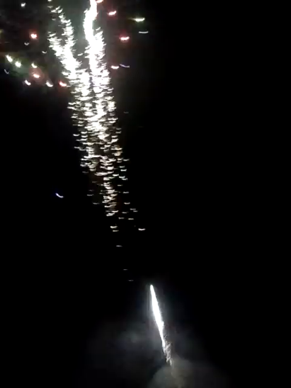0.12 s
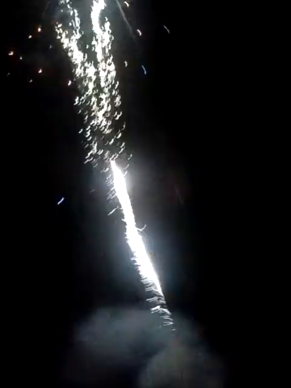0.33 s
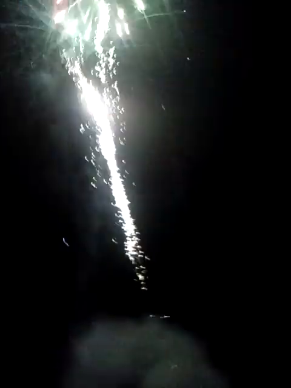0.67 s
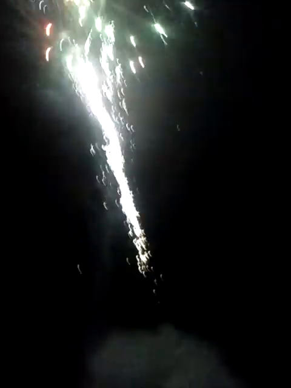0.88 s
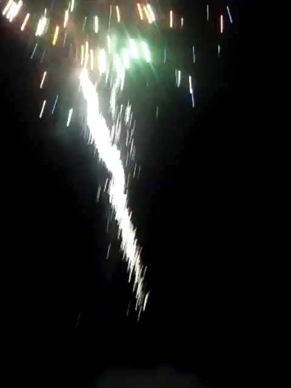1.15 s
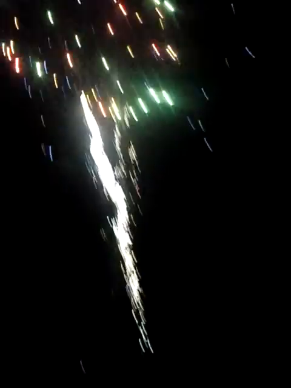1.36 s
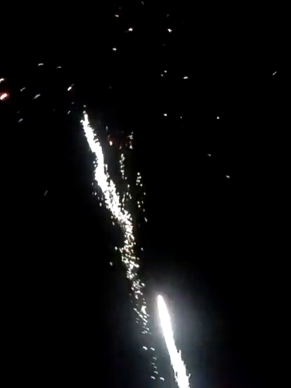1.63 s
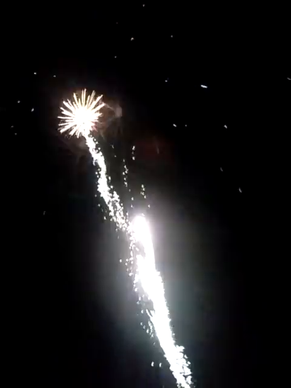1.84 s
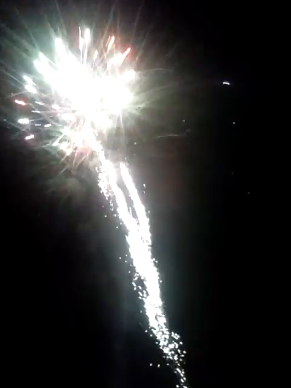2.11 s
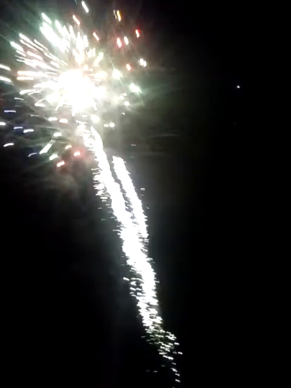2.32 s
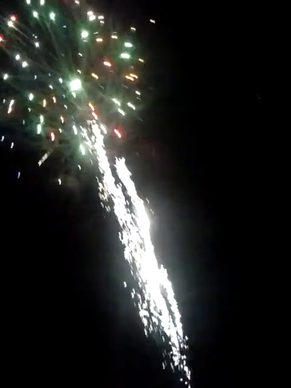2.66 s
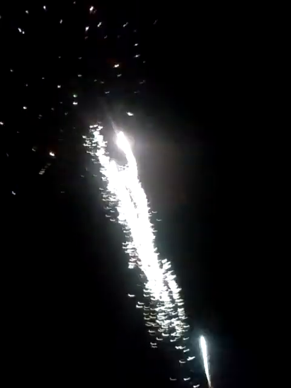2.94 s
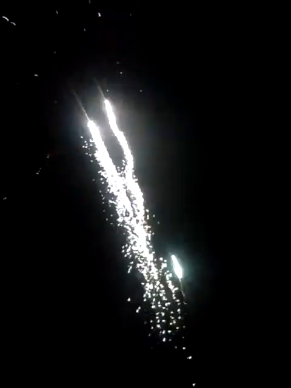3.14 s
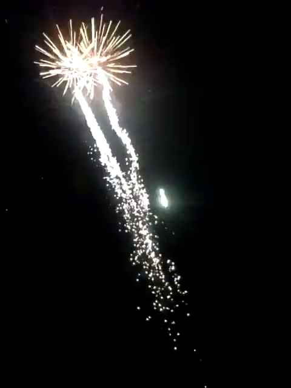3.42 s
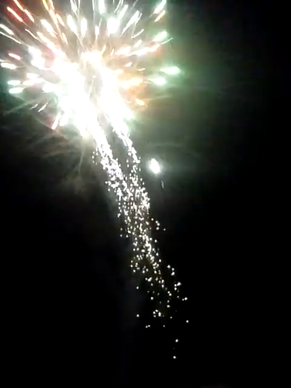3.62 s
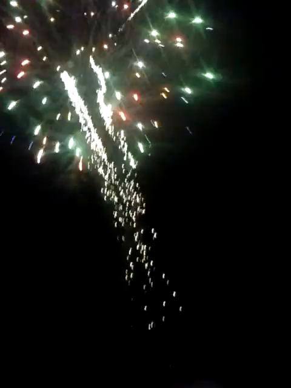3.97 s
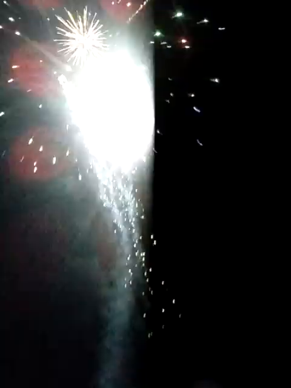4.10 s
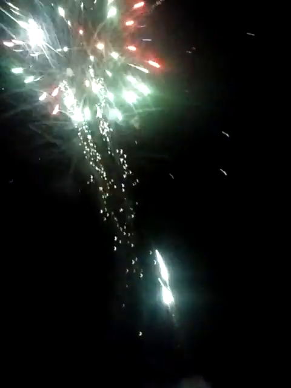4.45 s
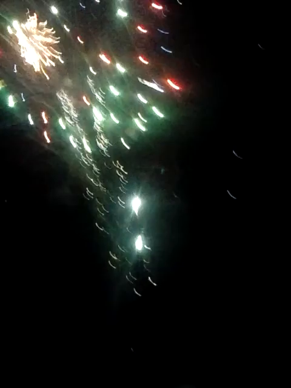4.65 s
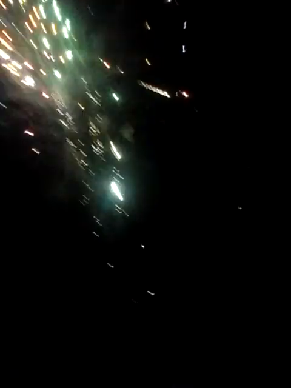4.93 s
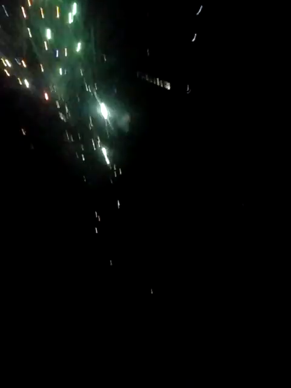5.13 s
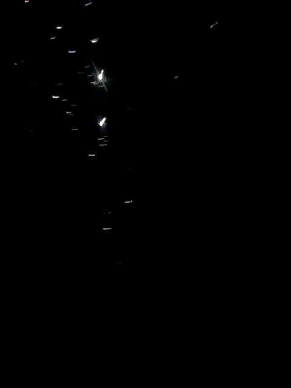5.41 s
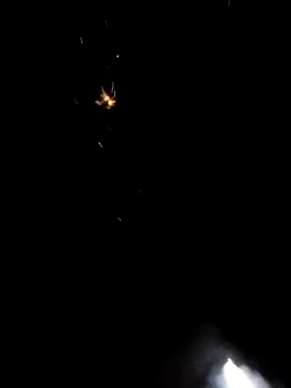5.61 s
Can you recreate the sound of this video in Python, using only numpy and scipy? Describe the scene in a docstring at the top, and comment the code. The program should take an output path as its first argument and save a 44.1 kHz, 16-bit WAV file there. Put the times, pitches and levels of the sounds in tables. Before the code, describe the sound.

A firework battery fires close by outdoors at night, heard through a narrow-band phone microphone that overloads on bangs and lacks deep bass. It opens on the fading echo and hiss of an earlier burst. Hollow tube thumps with short gas spurts come at 0.2 and 0.4 s, then hard, dry cracks overhead at 0.7 and 1.1. Launches follow at 1.55 and 1.7, a crack at 2.1, and a tight launch-and-burst cluster at 2.45-2.6. A tiny fizz and weak puff occur near 2.8. Double cracks hit at 3.65-3.7 and 4.4, with a barely audible rising thin tone around 3.9-4.15 and soft launches at 4.2-4.3. A weaker crack lands at 4.9; a light launch thump at 5.7 ends it. Each burst brings instant wall slaps, a brief boom, dull house thuds within half a second, a bright tree wash and sizzling stars, fading into faint air hiss.

```python
"""A firework cake at night, close to a narrow-band phone microphone, under a faint steady hiss of night air.
It opens in the echoes of a shell already burst; mortar tubes then thump with jets of gas and comets hiss.
Shells crack overhead as short pressure waves, with booms, wall slaps, house echoes, a tree wash and hissing stars.
Launches and bursts alternate to the end; a short fizz and later a faint rising tone sound among them.
The microphone sheds deep bass, overloads on the bangs, turns itself down and rings at its band edge."""
import sys
import numpy as np
from scipy import signal
from scipy.fft import rfft, irfft
from scipy.io import wavfile

SR = 44100
rng = np.random.default_rng(int(sys.argv[2]) if len(sys.argv) > 2 else 0)


def generate_wav(sig):
    """Save sig (samples, or channels by samples) to the path in sys.argv[1] as 16-bit PCM at SR."""
    pcm = np.round(np.clip(np.atleast_2d(sig).T, -1, 1) * 32767).astype(np.int16)
    wavfile.write(sys.argv[1], SR, pcm)


N = 254893
TIME = np.arange(N) / SR  # s from the start of the scene
AGE = np.arange(SR // 2) / SR  # s from the start of one event

# mortar launches; levels are relative:
# start_s, blast_db, jet_db, scatter_db, tube_travel_ms (the shell's time up the tube), jet_centre_hz
LAUNCHES = [(0.1883, 1.5, 1, 2, 5.8, 3760), (0.3652, -1.5, 5.5, 2.5, 3.6, 2960),
            (1.5573, 2.5, 2, 2.5, 6.6, 3130), (1.7129, 1, 2.5, 2, 3.95, 2460),
            (2.4600, 2.5, 3, 2, 3.4, 2620), (2.579, -1.5, -6, -1, 1.7, 4300),
            (2.8379, -17.5, -5, -13, 10, 4200), (4.1886, -15.5, -3.5, -11, 10, 3200),
            (4.277, -9.5, -2.5, -7.5, 6.2, 3400), (5.7119, -11, -3, -7.5, 6.1, 4540)]
# shell bursts overhead; levels are relative: start_s, blast_db, overpressure_ms, scatter_db, far_echo_db
BURSTS = [(-0.225, 0, 1, -2, 2), (0.7125, -2, 0.97, -0.5, 1), (1.0937, -2, 1.33, -2, 1),
          (2.1141, -2, 0.7, -1, 1), (2.5082, -5, 1.3, -3.5, -2), (3.6429, -1, 0.88, 0.5, 3),
          (3.6990, -2.5, 1, -1, 0), (4.3754, -1, 0.73, -1, 1), (4.4298, 2.5, 0.82, 3.5, 2),
          (4.9078, -8, 0.98, -7.5, -2)]


def undb(db):
    """Decibels to gain."""
    return 10 ** (np.asarray(db) / 20)


def add(out, start_s, sound):
    """Mix a sound into out from start_s on; it may have begun before time 0."""
    i = int(round(start_s * SR))
    part = sound[max(-i, 0):max(len(out) - i, 0)]
    first = max(i, 0)
    out[first:first + len(part)] += part


def butter(x, hz, kind, order=2):
    """Causal Butterworth low-pass or high-pass."""
    return signal.sosfilt(signal.butter(order, min(hz, .45 * SR), kind, fs=SR, output="sos"), x)


def on_log_axis(hz, points, values):
    """Read a table along log frequency."""
    return np.interp(np.log(hz + 1), np.log(points), values)


def colour(x, spectrum):
    """Shape x by a spectrum of (hz, db) points, then bring it to rms 1."""
    hz = np.fft.rfftfreq(len(x), 1 / SR)
    gain = undb(on_log_axis(hz, *np.transpose(spectrum)))
    y = irfft(rfft(x) * gain, len(x))
    return y / np.std(y)


def coloured_burst(spectrum):
    """Fresh random noise as long as one event, coloured, at rms 1."""
    return colour(rng.standard_normal(len(AGE)), spectrum)


def swell(centre_s, width_s):
    """A short bell-shaped rise and fall."""
    return np.exp(-.5 * ((AGE - centre_s) / width_s) ** 2)


def waver(hz):
    """A random wobble of unit spread, low-passed at hz."""
    x = butter(rng.standard_normal(N), hz, "low")
    return x / np.std(x)


def noise(spectrum, flutter_db, flutter_hz):
    """Coloured noise whose level flutters at random."""
    return colour(rng.standard_normal(N), spectrum) * undb(flutter_db * waver(flutter_hz))


def linger(events, fall_db_per_s, peak_s=0, rise_db_per_s=0):
    """Joint envelope of (s, dB) events that each swell or hold until peak_s, then fade; their powers add."""
    power = 0
    for start_s, db in events:
        past = TIME - start_s - peak_s
        level_db = db + np.minimum(rise_db_per_s * past, -fall_db_per_s * past)
        power = power + (TIME > start_s) * undb(level_db) ** 2
    return np.sqrt(power)


def blast(length_ms):
    """A shock front, a short overpressure and a longer suction."""
    u = AGE * 1000 / length_ms
    return (1 - u) * np.exp(-u)


def reflect(wave, paths):
    """The direct wave and its near reflections, each delayed and scaled by its path."""
    out = np.zeros(len(wave))
    for delay_ms, db in paths:
        add(out, delay_ms / 1000, undb(db) * wave)
    return out


def scatter(table, start_s, rise_s):
    """Countless small reflections as decaying noise; each octave dies at its own pace."""
    points, db, t60 = np.transpose(table)
    spectrum = rfft(coloured_burst(np.c_[points, db]))
    octave = np.clip(np.log2(np.fft.rfftfreq(len(AGE), 1 / SR) / 60 + 1e-9), 0, 7)
    out = 0
    for k in range(8):
        # overlapping triangular bands, one octave apart from 60 Hz up
        band = irfft(spectrum * np.maximum(1 - abs(octave - k), 0), len(AGE))
        t60_s = on_log_axis(60 * 2 ** k, points, t60)
        out = out + band * np.exp(-np.log(1000) * AGE / t60_s)
    return out * np.clip((AGE - start_s) / rise_s, 0, 1)


def night():
    """A faint, dull, steady hiss of open air, made of coloured noise."""
    # spectrum of the night air: frequency_hz, relative_level_db (per Hz)
    night_air = [(25, 0), (60, -3), (150, -3), (500, -2.5), (1000, 0), (2300, 1), (3800, -7), (5000, -16),
                 (7000, -26)]
    return undb(-56.5) * colour(rng.standard_normal(N), night_air)


def bursts(echo_blur_db=-17, slap_db=-17, slap_fall_db_per_ms=0.5):
    """Shells crack overhead; the wall answers about as loudly, far houses with dull thuds."""
    # near reflections off ground and wall: delay_ms, level_db
    near_paths = [(0, 0), (2.7, -12), (4.7, -16), (8.5, -16), (10.3, 1), (13.2, -6), (14.6, -13),
                  (26.3, -17)]
    # echoes from far houses: delay_s, relative_level_db
    houses = [(.235, -28.5), (.446, -29), (.526, -35.5)]
    # scattered sound: frequency_hz, relative_level_db (per Hz), t60_s
    surroundings = [(40, -23, 0.092), (123, -2, 0.2), (255, -3.5, 0.27), (477, 8.5, 0.13), (970, -6, 0.19),
                    (1960, -11, 0.19), (3900, -19, 0.21), (7150, -26, 0.21)]
    # spectra of the tearing casing and of the echo blur: frequency_hz, relative_level_db (per Hz)
    tear_spectrum = [(300, 0.5), (1000, 3.5), (2300, 5), (4000, -0.5), (7500, -4.5)]
    far_spectrum = [(50, -19.5), (150, 6), (320, 15), (600, -25), (1500, -6.5), (6000, -23)]
    out = np.zeros(N)
    for start_s, db, length_ms, scatter_db, far_db in BURSTS:
        # the tearing casing roughens the wave just behind its front
        tear = undb(-16.5) * swell(0.0025, 0.0013) * coloured_burst(tear_spectrum)
        # each shell, from its own place in the sky, finds a few more surfaces to slap off
        slaps = [(ms, slap_db - slap_fall_db_per_ms * ms) for ms in rng.uniform(15, 70, size=12)]
        crack = reflect(blast(length_ms) + tear, list(near_paths) + slaps)
        crack = butter(butter(crack, 3520, "low", order=1), 119, "high")
        add(out, start_s, undb(db + 15.0) * crack)
        add(out, start_s, undb(scatter_db - 5.5) * scatter(surroundings, 0.0075, 0.0023))
        # distance takes the edge off the blast, and uneven house fronts blur it
        thud = undb(1.5) * butter(butter(blast(length_ms), 390, "low"), 135, "high")
        for delay_s, echo_db in houses:
            blur = undb(echo_blur_db) * np.exp(-AGE / .008) * coloured_burst(far_spectrum)
            add(out, start_s + delay_s, undb(far_db + echo_db + 10) * (thud + blur))
    return out


def booms(base_db=-19, growth_db_per_db=3.5, rise_s=0.01, decay_s=0.019):
    """The heavier the shell, told by its scatter, the more a low boom of noise swells under its crack."""
    # spectrum of the boom: frequency_hz, relative_level_db (per Hz)
    boom_spectrum = [(80, -25), (130, -3), (190, -3), (300, -3.5), (450, -6), (650, -21), (2000, -50)]
    out = np.zeros(N)
    envelope = np.minimum(AGE / rise_s, 1) * np.exp(-AGE / decay_s)
    for start_s, _, _, scatter_db, _ in BURSTS:
        gain = undb(base_db + growth_db_per_db * scatter_db)
        add(out, start_s, gain * envelope * coloured_burst(boom_spectrum))
    return out


def far_echoes():
    """Every bang rolls unevenly round the neighbourhood; a line of trees returns bursts as a bright wash."""
    # spectra of the low roll and of the trees' echo: frequency_hz, relative_level_db (per Hz)
    roll_spectrum = [(25, -18.5), (60, -5.5), (130, -1.5), (300, -2.5), (600, -9.5), (1200, -25),
                     (3000, -37.5), (7000, -31)]
    tree_spectrum = [(500, -13.5), (1100, -4), (2300, 3.5), (4000, 2), (5200, -4), (6600, -1),
                     (8000, -32.5)]
    launch_roll_db, burst_roll_db = -45, -44.5
    roll_hold_s, roll_fall_db_per_s = 0.22, 23  # only bursts hold the roll
    trees_db, trees_delay_s, trees_rise_db_per_s, trees_fall_db_per_s = -48, 0.26, 84, 43.5

    tubes = [(start_s, scatter_db + launch_roll_db) for start_s, _, _, scatter_db, _, _ in LAUNCHES]
    shells = [(start_s, far_db) for start_s, *_, far_db in BURSTS]
    launch_roll = linger(tubes, roll_fall_db_per_s)
    burst_roll = undb(burst_roll_db) * linger(shells, roll_fall_db_per_s, roll_hold_s)
    roll = np.hypot(launch_roll, burst_roll)
    wash = undb(trees_db) * linger(shells, trees_fall_db_per_s, trees_delay_s, trees_rise_db_per_s)
    rolling = roll * noise(roll_spectrum, flutter_db=3.0, flutter_hz=22.2)
    return rolling + wash * noise(tree_spectrum, flutter_db=2.2, flutter_hz=18)


def burning():
    """Stars and comets hiss once lit and fade as they burn, stars duller from high up; one fizz, like a fuse."""
    # spectra of the hiss and of the fizz: frequency_hz, relative_level_db (per Hz)
    hiss_spectrum = [(300, -7), (1000, 2.5), (2300, 2.5), (3800, -3), (5200, -5.5), (6600, -7), (8000, -38)]
    fizz_spectrum = [(1500, -29), (3000, 8), (3800, 6), (5000, -3), (7000, -22)]
    comet_db, comet_fall_db_per_s = -51, 20.5
    stars_db, stars_fall_db_per_s, stars_top_hz = -49, 12, 4600  # level ahead of the low-pass
    fizz_s, fizz_width_s, fizz_db = 2.775, .013, -43

    stars = linger([(start_s, stars_db) for start_s, *_ in BURSTS], stars_fall_db_per_s)
    comets = linger([(start_s, comet_db) for start_s, *_ in LAUNCHES], comet_fall_db_per_s)
    near = noise(hiss_spectrum, flutter_db=2.2, flutter_hz=13)
    high = butter(noise(hiss_spectrum, flutter_db=1.84, flutter_hz=14), stars_top_hz, "low", order=4)
    fizz = undb(fizz_db) * np.exp(-.5 * ((TIME - fizz_s) / fizz_width_s) ** 2)
    return comets * near + stars * high + fizz * colour(rng.standard_normal(N), fizz_spectrum)


def launches(leak_db=-24, leak_thump_db=-15, jet_decay_s=0.0099, fresh=0.46, jet_ring_gain=undb(2) - 1,
             surround_db=-12):
    """Gas leaks past the shell, the lift charge bursts out and rings the tube, and a jet of gas follows."""
    # quarter-wave ring of a mortar tube: frequency_hz, level_db, t60_s
    tube = [(184.4, 4.5, 0.056), (576, -4.5, 0.067), (724, -10, 0.07)]
    # near reflections: delay_ms, relative_level_db
    near_paths = [(0, 6.5), (5.2, -15.5), (9.4, -14.5), (15.2, -25.5)]
    # scattered sound: frequency_hz, relative_level_db (per Hz), t60_s
    surroundings = [(40, -1.5, .2), (104.5, 3, 0.2), (196, 0, 0.17), (359, -4, 0.2), (547, 2, 0.16),
                    (720, -4.5, 0.31), (1340, -13.5, 0.07), (2490, -29, 0.32), (7000, -39.5, 0.43)]
    # spectrum of the gas jet: frequency_hz, relative_level_db (per Hz)
    jet_spectrum = [(200, -0.5), (750, 7.5), (1100, -2), (1600, -1), (2200, 4), (3000, -3), (4000, 3.5),
                    (5500, -7), (7500, -8.5)]
    out = np.zeros(N)
    ring = np.zeros(len(AGE))
    for hz, db, t60_s in tube:
        ring += undb(db) * np.cos(2 * np.pi * hz * AGE) * np.exp(-np.log(1000) * AGE / t60_s)
    thump = butter(undb(4.5) * reflect(blast(2.3), near_paths) + ring, 2500, "low")
    # the tubes stand together, so their scatter is mostly alike
    shared = scatter(surroundings, 0.0065, 0.016)
    # the gas spits as the shell leaves the muzzle, peaks just after and dies away
    spit = undb(-9.5) * swell(0, 0.00047)
    peak = undb(-2.5) * swell(0.0064, 0.001)
    jet = spit + peak + undb(-7.0) * np.exp(-AGE / jet_decay_s)
    # the first push of the charge, while the shell still plugs the tube
    push = undb(leak_thump_db) * butter(blast(2.0), 700, "low")
    for start_s, db, jet_db, scatter_db, lead_ms, jet_hz in LAUNCHES:
        lead_s = lead_ms / 1000
        # the leak grows until the shell leaves the muzzle
        leak = undb(leak_db) * np.exp(np.minimum(AGE / lead_s, 1)) * (AGE < lead_s)
        gas = coloured_burst(jet_spectrum)
        resonance = signal.lfilter(*signal.iirpeak(jet_hz, 3.5, fs=SR), gas)
        gas = 0.79 * gas + jet_ring_gain * resonance
        # the reversed gas noise gives the leak a different stretch of it
        add(out, start_s - lead_s, undb(jet_db) * leak * gas[::-1] + undb(db) * push)
        add(out, start_s, undb(db) * thump + undb(jet_db) * jet * gas)
        around = shared + fresh * scatter(surroundings, 0.0083, 0.0082)
        add(out, start_s, undb(scatter_db + surround_db) * around)
    return out


def thin_tone(db=-53, start_s=3.87, length_s=.3):
    """A faint thin sine rises from 700 to 735 Hz, swelling and fading as it goes."""
    u = np.clip((TIME - start_s) / length_s, 0, 1)
    hz = 700 + 35 * np.sqrt(u)
    envelope = np.sqrt(4 * u * (1 - u))
    return undb(db) * envelope * np.sin(2 * np.pi * np.cumsum(hz) / SR)


def scene():
    """Bursts and launches, their echoes, the hiss of burning, the thin tone and the night air, in one channel."""
    bangs = bursts() + booms() + launches()
    return (night() + bangs + far_echoes() + burning() + thin_tone())[None]


def record(dry, ceiling=0.72, duck=2.2, mic_band_hz=7390, top_hz=16500):
    """The microphone inverts, sheds deep bass and overloads; its narrow band rings and the ripples clip once more."""
    x = -butter(butter(dry, 79, "high", order=1), 39.5, "high", order=1) / ceiling
    # soft overload towards the ceiling
    x = ceiling * x / (1 + x ** 8) ** (1 / 8)
    # gain control: a bang that closely follows another comes out a little lower
    recent_power = np.maximum(butter(x ** 2, 2.2, "low", order=3), 0)
    x = x / (1 + duck * recent_power)
    # the steep band edge runs backward and then forward in time, so it rings on both sides of a bang
    x = butter(x[:, ::-1], mic_band_hz, "low", order=16)[:, ::-1]
    x = np.clip(butter(x, mic_band_hz, "low", order=16), -.71, .71)
    # the last clip adds treble; a steep low-pass limits it
    return signal.sosfilt(signal.ellip(8, .2, 70, top_hz, fs=SR, output="sos"), x)


dry = scene()
out = record(dry)
generate_wav(out)
```